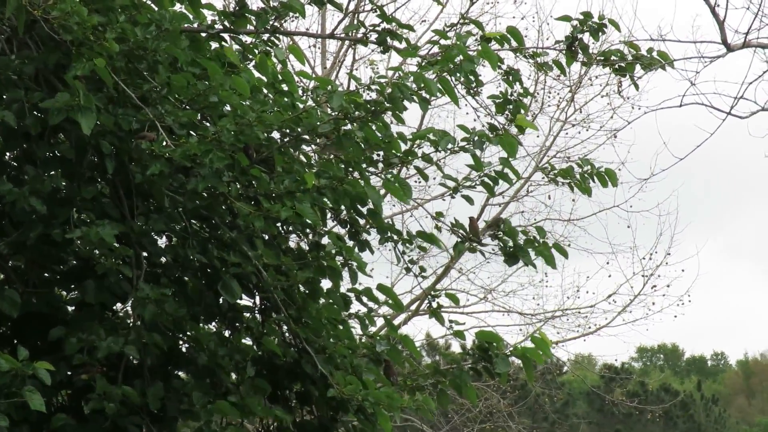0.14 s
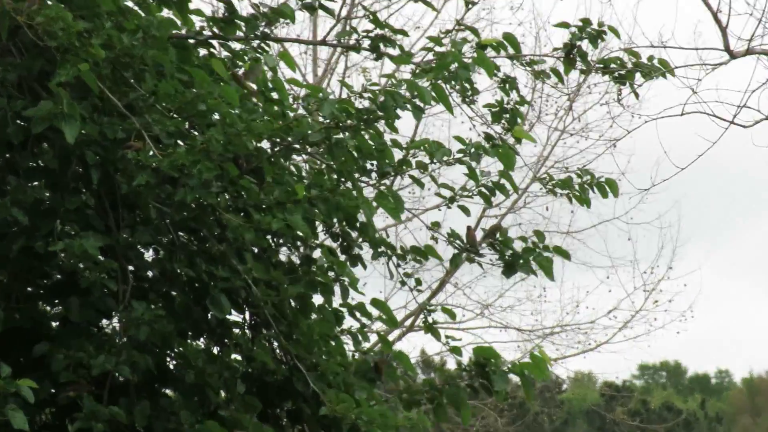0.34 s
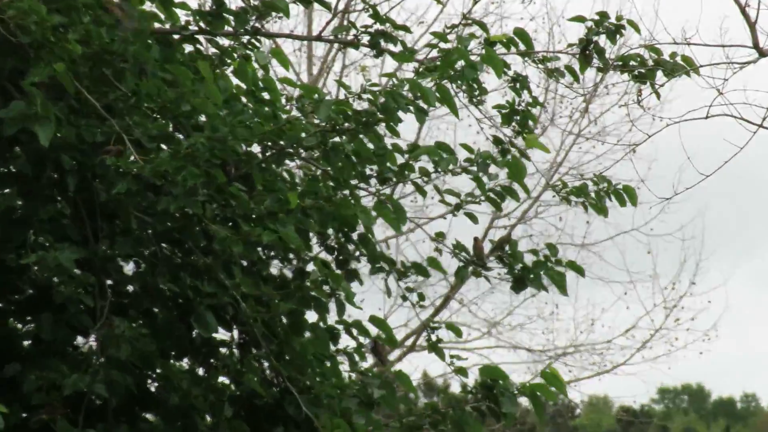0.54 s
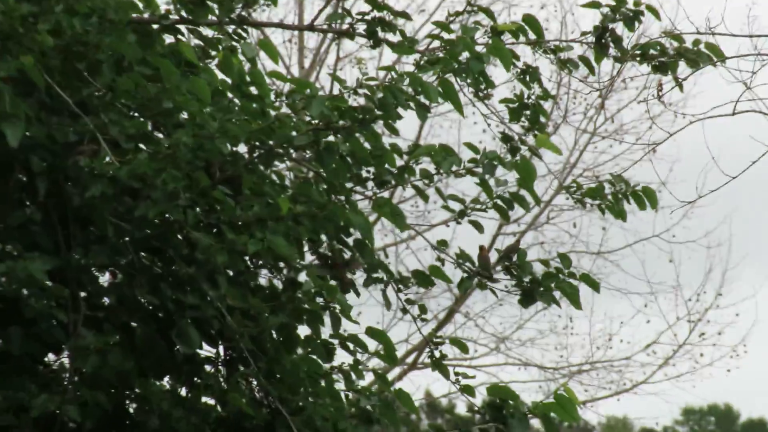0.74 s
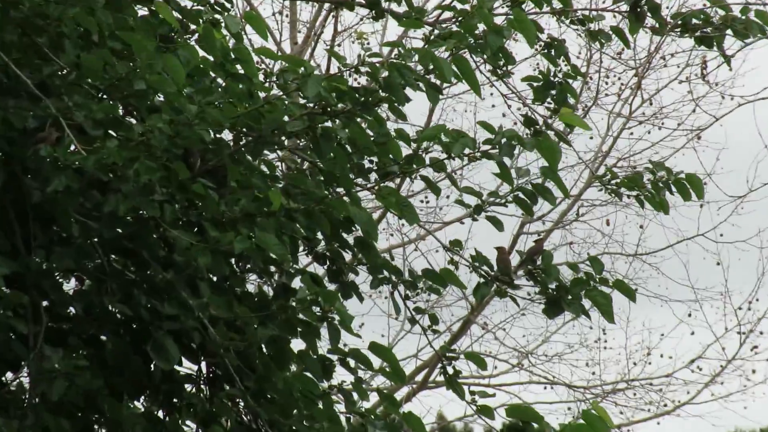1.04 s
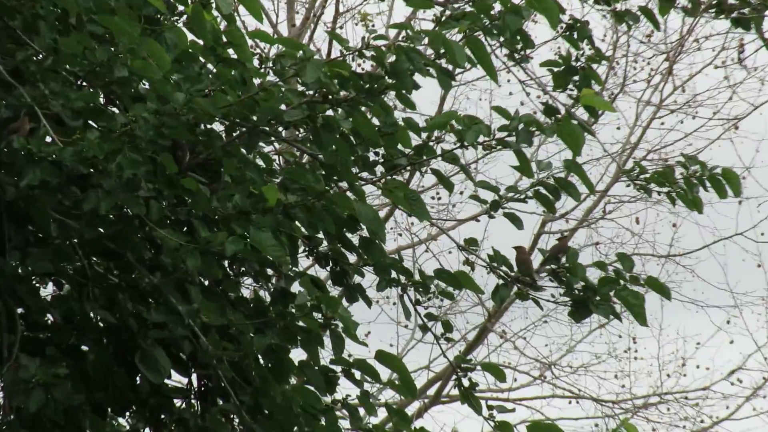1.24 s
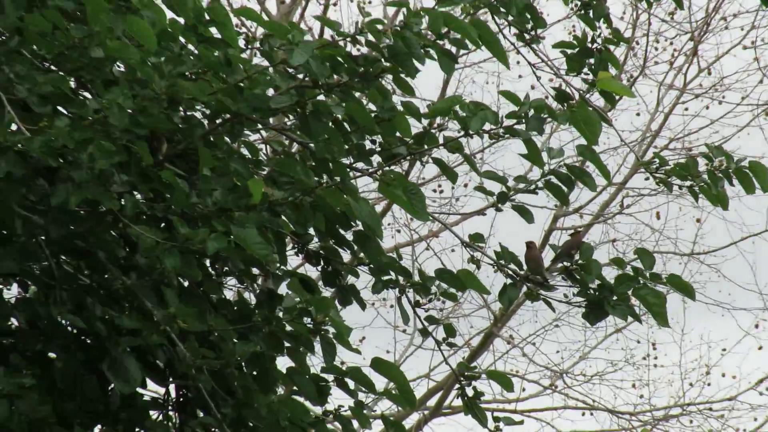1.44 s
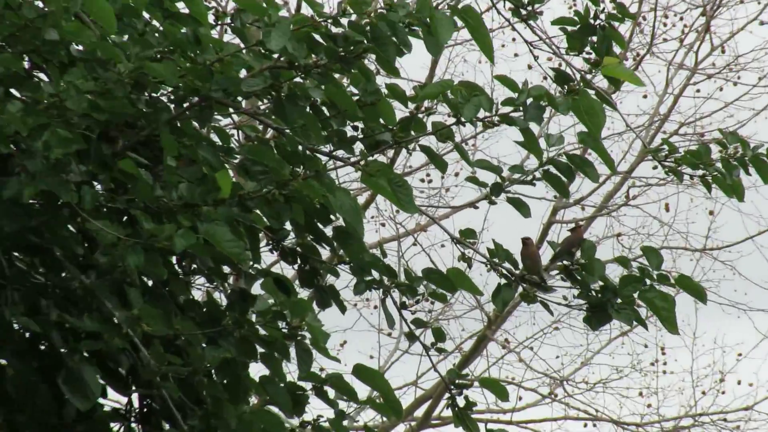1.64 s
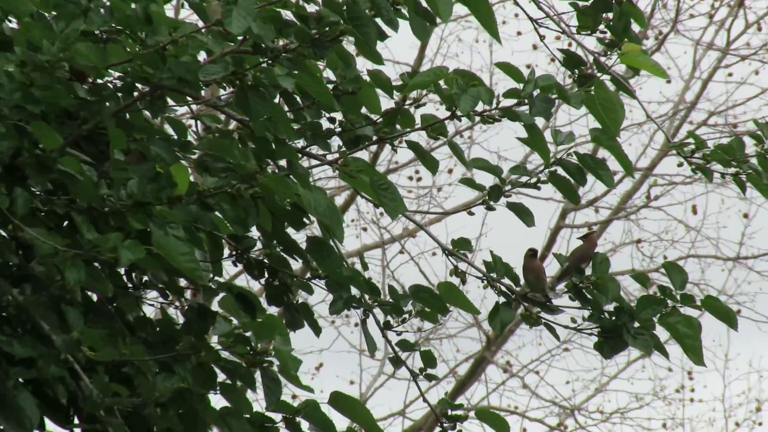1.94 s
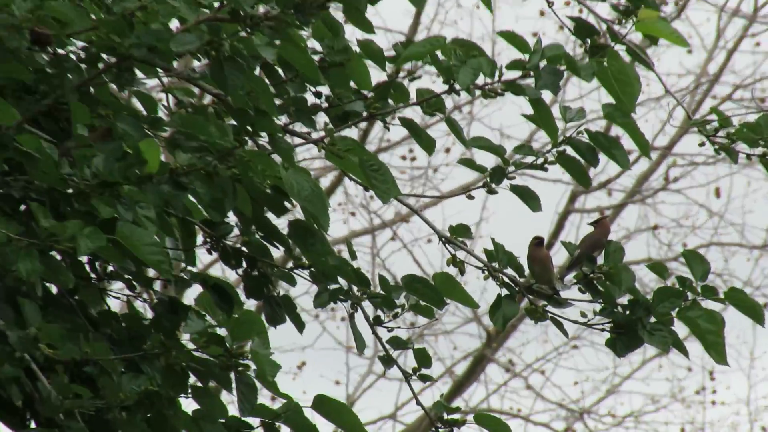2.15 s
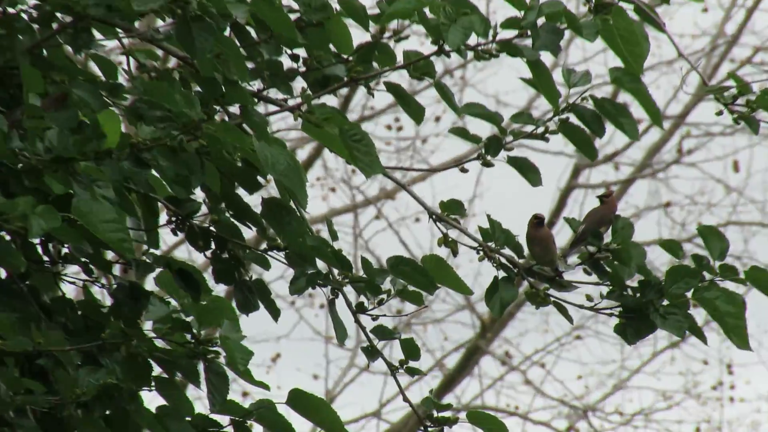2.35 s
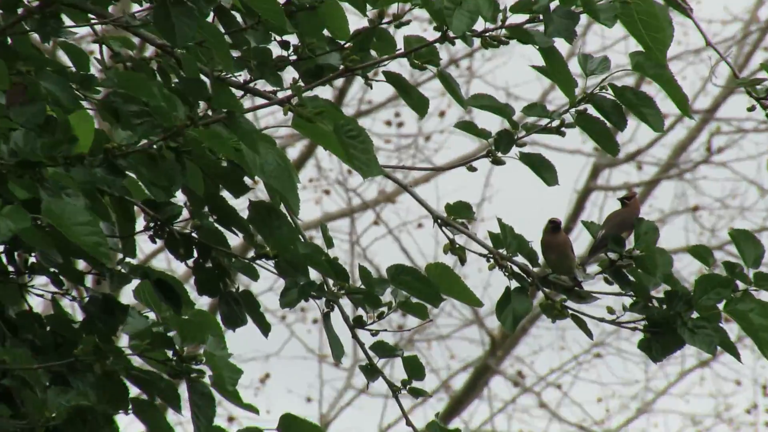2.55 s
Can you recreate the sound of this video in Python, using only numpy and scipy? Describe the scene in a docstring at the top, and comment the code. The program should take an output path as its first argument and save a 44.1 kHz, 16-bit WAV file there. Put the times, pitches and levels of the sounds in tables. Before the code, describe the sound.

Small birds give faint, buzzy, very high trills outdoors, joined at first by lower, far-off whistles. Wind in the leaves and distant rumble run throughout, and the camera's microphone picks up light handling knocks and its own faint whine.

```python
"""Wind in leaves and distant rumble fill the air, over the hum and whine of a hand-held camera's tape drum.
A far bird ends a run of low whistles while waxwings trill thinly from a leafy tree: both songs are
frequency-modulated tones, scattered by the foliage. A few knocks of the hand set the casing ringing,
and the lens motor adds a broadband hiss once it starts to zoom."""
import sys
import numpy as np
from scipy import signal
from scipy.fft import rfft, irfft, next_fast_len
from scipy.io import wavfile

SR = 44100
rng = np.random.default_rng(int(sys.argv[2]) if len(sys.argv) > 2 else 0)


def unload_audio(sound):
    """Save the sound as a 16-bit wav file, at the path given as the first command line argument."""
    columns = np.transpose(np.atleast_2d(sound))
    # keep every value between -1 and 1, then stretch to whole-number steps
    steps = np.round(np.clip(columns, -1, 1) * 32767)
    wavfile.write(sys.argv[1], SR, steps.astype(np.int16))


N = 119511


def from_db(db):
    """The decibel scale: 20 dB is a tenfold amplitude."""
    return 10 ** (np.asarray(db) / 20)


def unit_rms(x):
    """Normalisation to unit mean power."""
    return x / np.sqrt(np.mean(x ** 2) + 1e-20)


def in_time(points):
    """Linear interpolation of a time curve at every sample."""
    return np.interp(np.arange(N) / SR, *np.transpose(points))


def at_hz(points, hz):
    """Interpolation of a spectrum on a logarithmic frequency axis."""
    known_hz, values = np.transpose(points)
    return np.interp(np.log(hz), np.log(known_hz), values)


def drift(corner_hz):
    """Random fluctuation: low-passed noise of unit rms, computed at every 40th sample."""
    pole = np.exp(-2 * np.pi * corner_hz * 40 / SR)
    slow = signal.lfilter([1], [1, -2 * pole, pole * pole], rng.standard_normal(N // 40 + 2002))[2000:]
    return np.interp(np.arange(N) / 40, np.arange(len(slow)), unit_rms(slow))


def taper(u, length_s, edge_s):
    """Raised-cosine onset and release as u runs from 0 to 1."""
    return np.sin(np.pi / 2 * np.clip(np.minimum(u, 1 - u) * length_s / edge_s, 0, 1)) ** 2


def mid_side(correlation, mid, side):
    """Sum and difference of independent signals give left and right a set correlation."""
    return np.sqrt(1 + correlation) * mid + np.sqrt(1 - correlation) * side * np.array([[1], [-1]])


def panned(x, pan_db):
    """Direction by level difference; positive is left."""
    return x * from_db([[pan_db / 2], [-pan_db / 2]])


def add(out, start_s, sound):
    """Superposition of a sound from a given time on."""
    i = int(start_s * SR)
    out[..., i:i + sound.shape[-1]] += sound[..., :N - i]


# Left-right correlation of the noise: f/Hz, coefficient
NOISE_CORRELATION = [(20, .998), (40, 0.98), (90, 0.99), (170, 0.43), (260, 0.12), (470, -0.31),
                     (800, 0.045), (1200, 0.083), (1700, -0.42), (4000, -0.093), (9000, -0.16),
                     (13000, -0.21)]


def banded_noise(spectrum, flicker_db=1.2):
    """Coloured stereo noise, amplitude-modulated at random in half-octave bands; the mid has unit rms."""
    hz = np.maximum(np.fft.rfftfreq(N + SR, 1 / SR), 10)
    white = rfft(rng.standard_normal((2, N + SR)))
    coloured = from_db(at_hz(spectrum, hz)) * mid_side(at_hz(NOISE_CORRELATION, hz), *white)
    half_octaves = 2 * np.log2(hz / 20)
    out, common = 0, drift(13)
    for k in range(20):
        window = np.cos(np.pi / 2 * np.clip(half_octaves - k, -1, 1)) ** 2
        band = irfft(coloured * window, N + SR)[:, :N]
        out = out + band * from_db(flicker_db * (.5 * common + drift(11)))
    return out / np.sqrt(np.mean(out.mean(axis=0) ** 2))


# Spectral density of wind and rumble: f/Hz, relative level/dB
WIND_SPECTRUM = [(15, -37), (25, -21), (40, -2.5), (58, 1), (75, -4), (105, -6), (135, -9.5), (230, -1.5),
                 (330, -3.5), (420, -7.5), (830, -10.5), (1100, -16), (1900, -21), (4860, -32.5),
                 (7880, -36.5), (9000, -29), (10300, -47.5), (12500, -43.5), (15300, -55)]
# Their envelope: t/s, level/dB
WIND_LEVEL = [(0, -49), (.25, -48), (.56, -47.5), (1.0, -48), (1.9, -48.5), (2.3, -47.5), (2.71, -47.5)]


def wind_and_rumble():
    """Broadband noise: wind in leaves and distant rumble, densest at low frequencies."""
    return from_db(in_time(WIND_LEVEL)) * banded_noise(WIND_SPECTRUM)


# Resonances of the drum's whine: f/Hz
RESONANCE_HZ = [8600, 8792, 8925, 9110, 9195, 9310]
# For each resonance: bandwidth/Hz, level before modulation/dB
RESONANCE_SHAPES = [(250, -86.5), (32, -81), (40, -86), (34, -77.5), (50, -84), (120, -83.5)]
DRUM_HZ, THROB_HZ = 149.85, 59.94
HUM_PEAK_DB, HUM_WAVER_DB = -55, 2
WHINE_STEADINESS = .7  # 0 is hiss, 1 a wavering tone


def tape_drum():
    """Rotation hums at the turning rate and modulates a whine of resonant noise twice a turn."""
    t = np.arange(N) / SR
    white, whine = rng.standard_normal((2, N)), 0
    for hz, (width_hz, db) in zip(RESONANCE_HZ, RESONANCE_SHAPES):
        radius = np.exp(-np.pi * width_hz / SR)
        resonator = [1, 0, -1], [1, -2 * radius * np.cos(2 * np.pi * hz / SR), radius ** 2]
        ring = signal.lfilter(*resonator, signal.lfilter(*resonator, white))
        envelope = np.abs(signal.hilbert(ring, next_fast_len(N)))[:, :N] + 1e-9
        whine = whine + from_db(db) * unit_rms(ring / envelope ** WHINE_STEADINESS)
    pulse = 1 + .4 * np.cos(2 * np.pi * 2 * DRUM_HZ * t)
    throb = 1 + .4 * np.cos(2 * np.pi * THROB_HZ * t)
    hum = from_db(HUM_PEAK_DB + HUM_WAVER_DB * drift(3.3)) * np.sin(2 * np.pi * DRUM_HZ * t)
    return hum + pulse * throb * mid_side(.85, *whine)


# The far bird's notes: onset t/s, duration/s, f/Hz, dip/Hz, rise/Hz, level before fading/dB
WHISTLE_NOTES = [(.025, .07, 2460, 110, 20, -62), (.13, .062, 2080, 0, 90, -59.5),
                 (.215, .046, 2090, 100, 0, -59), (.297, .054, 2030, 40, 30, -59),
                 (.528, .058, 2300, 70, 190, -56.5), (.62, .058, 2090, 130, 40, -60),
                 (.712, .056, 2020, 50, 50, -60), (.785, .03, 2040, 30, 0, -66)]
QUAVER_HZ, FLUTTER_DB, FADE_DB, BREAK_DB = 30, 2, 5, 5


def far_whistles():
    """Gliding pure tones that fade and break briefly mid-note; distance makes them quaver."""
    out, quaver = np.zeros(N), QUAVER_HZ * drift(40)
    for start, length, hz, dip_hz, rise_hz, db in WHISTLE_NOTES:
        u = np.linspace(0, 1, int(length * SR))
        arch = np.sin(np.pi * u)
        pitch = hz - dip_hz * arch ** 2 + rise_hz * u ** 2 + quaver[int(start * SR):][:len(u)]
        level_db = db - FADE_DB * u - BREAK_DB * arch ** 20
        envelope = np.sqrt(2) * from_db(level_db) * taper(u, length, edge_s=.0029)
        add(out, start, envelope * np.sin(2 * np.pi * np.cumsum(pitch) / SR))
    return out * from_db(FLUTTER_DB * drift(50))


def foliage_echoes(song, t60_s=.13, gain_db=-2.5):
    """Scattering off leaves and trunks: dense echoes, different on each side, decay exponentially."""
    t = np.arange(int(.2 * SR)) / SR
    echoes = rng.standard_normal((2, len(t))) * from_db(-60 * t / t60_s) * (t > .003)
    echoes /= np.sqrt(np.sum(echoes ** 2, axis=1, keepdims=True))
    return from_db(gain_db) * signal.fftconvolve(song[None], echoes, axes=1)[:, :N]


# The buzz that joins a trill's notes: onset t/s, duration/s, first f/Hz, last f/Hz, level/dB
WARBLE_SPANS = [(0.043, 0.056, 6900, 6840, -74), (0.142, .115, 6870, 6750, -71),
                (.522, 0.034, 7240, 7440, -66), (.66, 0.13, 7180, 7050, -68),
                (1.131, 0.14, 7500, 7060, -67), (1.47, .09, 7500, 7330, -66),
                (1.961, .18, 7670, 7200, -65.5), (2.324, 0.054, 7100, 7150, -70),
                (2.443, .022, 7200, 7500, -65)]
WARBLE_RATE_HZ, SWING_HZ, WANDER_HZ = 48.5, 220, 130


def warbles():
    """Frequency modulation: a tone swings quickly about a gliding, wandering pitch."""
    out, wander = np.zeros(N), WANDER_HZ * drift(59)
    for start, length, first_hz, last_hz, db in WARBLE_SPANS:
        u = np.linspace(0, 1, int(length * SR))
        swing = SWING_HZ * np.sin(2 * np.pi * WARBLE_RATE_HZ * length * u)
        pitch = first_hz + (last_hz - first_hz) * u + swing + wander[int(start * SR):][:len(u)]
        envelope = from_db(db) * taper(u, length, edge_s=.015)
        add(out, start, envelope * np.sin(2 * np.pi * np.cumsum(pitch) / SR))
    return out


def trill(notes, half_width_s, nominal_rise_hz):
    """Gaussian tone pulses, each swept upward by a slightly different amount."""
    out, t = np.zeros(N), np.arange(-.015, .015, 1 / SR)
    envelope = np.exp(-(t / half_width_s) ** 2)
    for (centre, hz, db), (chance, start_cycle) in zip(notes, rng.random((len(notes), 2))):
        rise_hz = nominal_rise_hz * (.63 + .49 * chance)
        pitch = hz + rise_hz * np.tanh(t / half_width_s) / 2
        cycles = np.cumsum(pitch) / SR + start_cycle
        add(out, centre + t[0], from_db(db) * envelope * np.sin(2 * np.pi * cycles))
    return out


# A trill that steps between two pitches: centre t/s, f/Hz, level/dB
STEPPING_TRILL = [(0.1725, 6850, -66), (0.18, 6960, -65), (0.221, 6890, -67), (0.66, 7500, -62),
                  (0.67, 7300, -66), (0.693, 7520, -52), (0.7115, 6850, -64), (0.728, 7470, -62),
                  (0.738, 7250, -63), (0.758, 7220, -66), (0.7735, 6960, -60), (0.793, 7490, -58),
                  (1.483, 6930, -63), (1.504, 7430, -63), (1.5175, 7050, -66), (1.5365, 7580, -63),
                  (1.5575, 7040, -66), (1.56, 7460, -65), (1.58, 6930, -64), (1.598, 7470, -65),
                  (1.6155, 6910, -64), (1.6355, 7500, -64), (1.651, 6960, -68), (1.675, 7410, -66),
                  (2.3365, 7120, -66), (2.351, 7400, -65), (2.37, 7220, -69)]
# A faster, sagging trill and lone chips: centre t/s, f/Hz, level/dB
SAGGING_TRILL = [(0.195, 7380, -67), (0.531, 7480, -68), (0.5415, 7070, -63), (1.1335, 7550, -65),
                 (1.1555, 7290, -61), (1.1765, 7870, -61), (1.19, 7860, -61), (1.2045, 7380, -61),
                 (1.2185, 7820, -60), (1.242, 7060, -61), (1.259, 7020, -63), (1.9685, 7960, -62),
                 (1.986, 7600, -62), (2.008, 7800, -60), (2.0245, 7350, -60), (2.046, 7540, -56),
                 (2.069, 7280, -59), (2.0905, 7430, -59), (2.099, 7470, -60), (2.108, 7050, -59),
                 (2.133, 7070, -63), (2.4515, 7180, -66), (2.4615, 7570, -67)]


def waxwings(rasp_db=1.5):
    """Fast random amplitude modulation roughens the trills and warbles into a rasp."""
    stepping = trill(STEPPING_TRILL, half_width_s=.005, nominal_rise_hz=60)
    sagging = trill(SAGGING_TRILL, half_width_s=.0048, nominal_rise_hz=220)
    return (stepping + sagging + warbles()) * from_db(rasp_db * (drift(150) - .3))


# Knocks of the hand on the casing: t/s, level/dB, f/Hz, T60/s, pan/dB
CASING_KNOCKS = [(.3655, -50, 3950, .011, -1), (.366, -43, 730, .03, -1), (.3685, -42, 1120, .022, -1),
                 (.432, -42, 430, .06, 2), (.438, -48, 310, .07, 2), (.449, -42.5, 415, .04, 2),
                 (.464, -37, 420, .012, 1), (1.308, -52, 850, .03, 0), (1.639, -42.5, 245, .055, 0),
                 (1.6582, -40.5, 1500, .013, 0), (1.659, -46, 230, .035, 0)]


def hand_knocks(rattle_gain=.3, rise_cycles=1.2):
    """Damped vibration: each knock builds over a cycle or so and rings down, roughened by rattle."""
    out, t = np.zeros((2, N)), np.arange(int(.12 * SR)) / SR
    for start, db, hz, t60, pan_db in CASING_KNOCKS:
        band = signal.butter(2, [hz / 1.3, hz * 1.3], "band", fs=SR)
        rattle = unit_rms(signal.lfilter(*band, rng.standard_normal(len(t))))
        ring = np.sin(2 * np.pi * hz * t) + rattle_gain * rattle
        envelope = from_db(-60 * t / t60) * (1 - np.exp(-t * hz / rise_cycles)) ** 2
        add(out, start, panned(from_db(db) * envelope / envelope.max() * ring, pan_db))
    return out


# Spectral density of the lens motor's hiss: f/Hz, relative level/dB
MOTOR_SPECTRUM = [(300, -14), (1000, 3.5), (2500, 0), (5000, -5), (8000, -9), (10500, -12), (14000, -20.5),
                  (15500, -29)]
# Its envelope: t/s, level/dB
MOTOR_LEVEL = [(0, -91), (.36, -94), (.4, -69), (.44, -58.5), (.5, -61.5), (.6, -63), (1.0, -63.5),
               (1.6, -62.5), (2.1, -64), (2.71, -64.5)]


def lens_motor():
    """Broadband machine noise: the hiss surges as the zoom starts, then settles."""
    return from_db(in_time(MOTOR_LEVEL)) * banded_noise(MOTOR_SPECTRUM)


def scene():
    """Superposition of the birds, their echoes, the air and the camera's own noises."""
    near, far = waxwings(), far_whistles()
    birds = panned(near, pan_db=.3) + panned(far, pan_db=-1.5) + foliage_echoes(near + far)
    return birds + wind_and_rumble() + lens_motor() + tape_drum() + hand_knocks()


def record(dry, cutoff_hz=15150):
    """Band limiting: a steep low-pass filter removes the highest treble."""
    return signal.sosfilt(signal.ellip(12, .3, 60, cutoff_hz, fs=SR, output="sos"), dry)


dry = scene()
out = record(dry)
unload_audio(out)
```